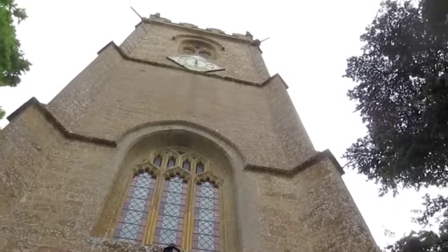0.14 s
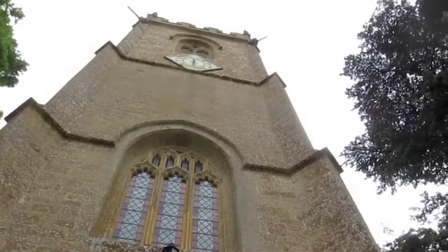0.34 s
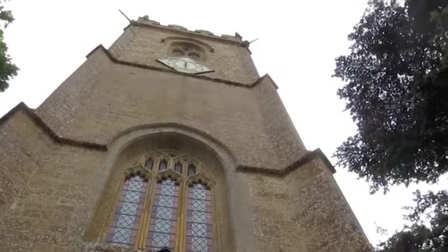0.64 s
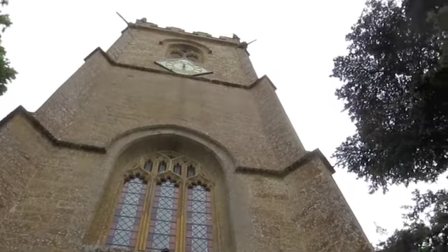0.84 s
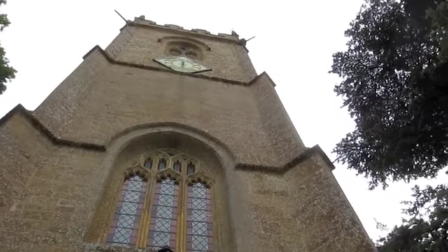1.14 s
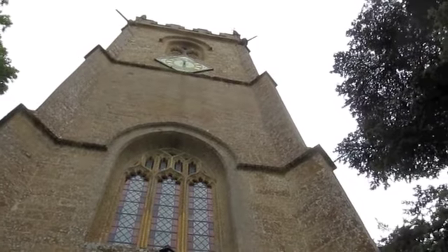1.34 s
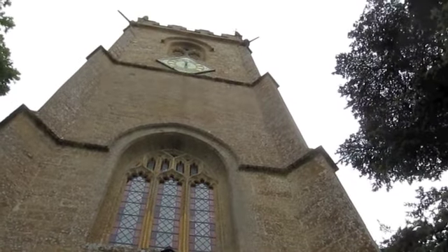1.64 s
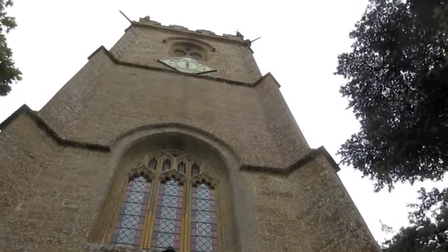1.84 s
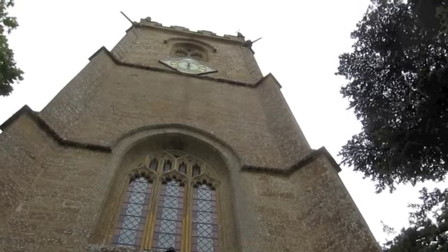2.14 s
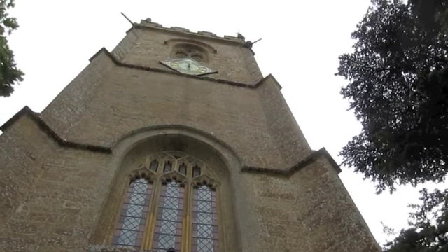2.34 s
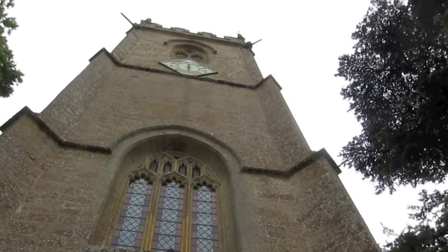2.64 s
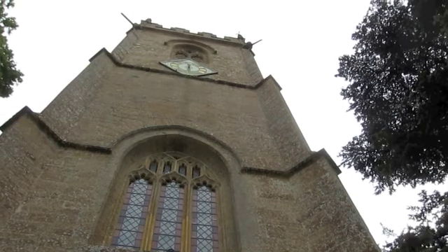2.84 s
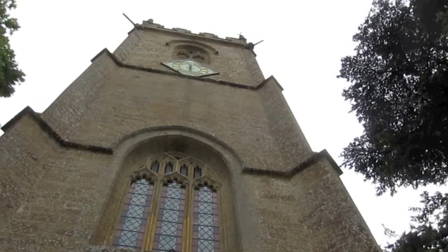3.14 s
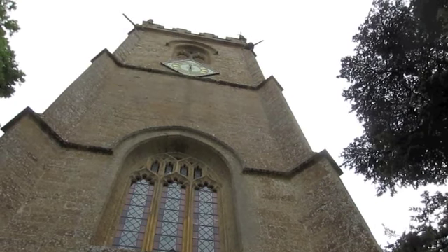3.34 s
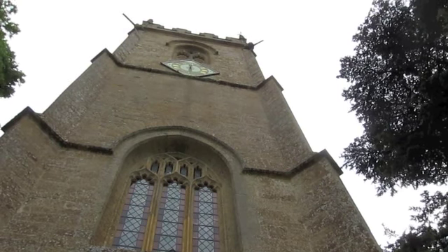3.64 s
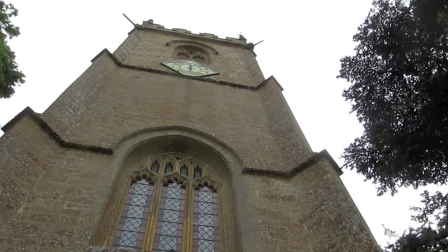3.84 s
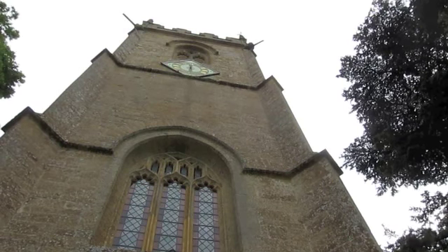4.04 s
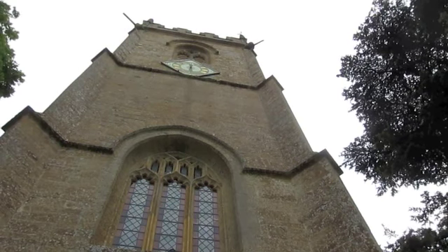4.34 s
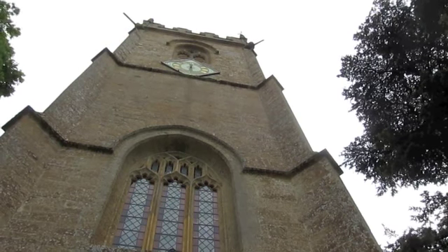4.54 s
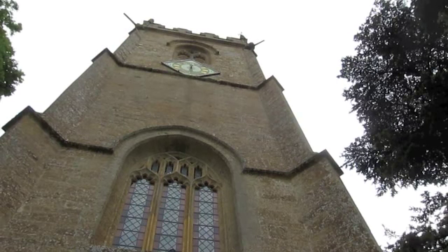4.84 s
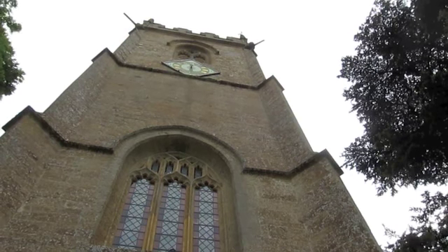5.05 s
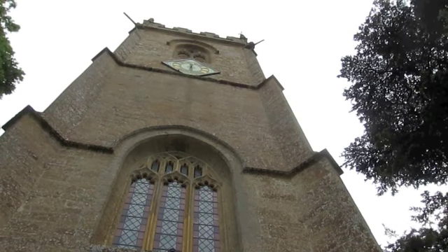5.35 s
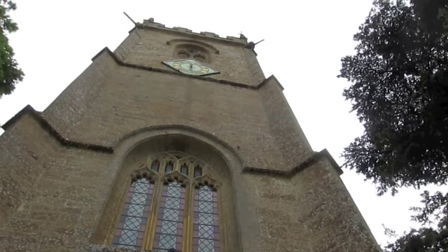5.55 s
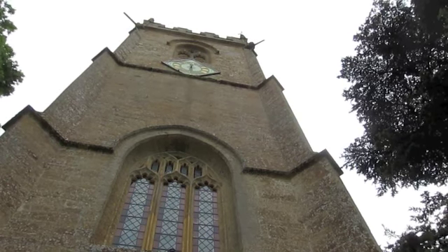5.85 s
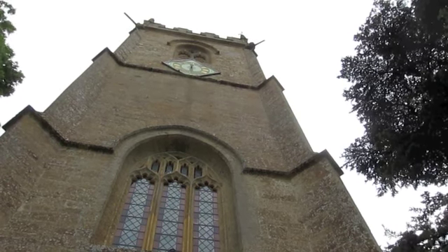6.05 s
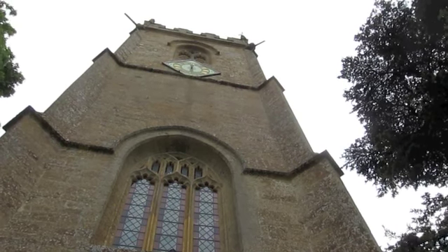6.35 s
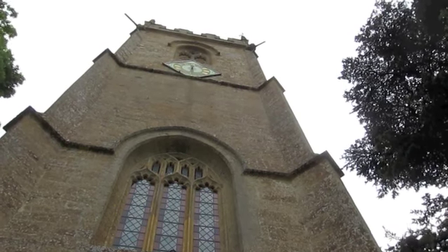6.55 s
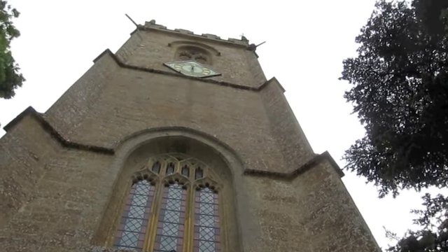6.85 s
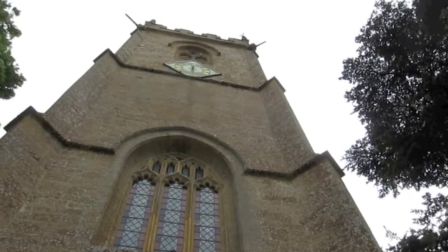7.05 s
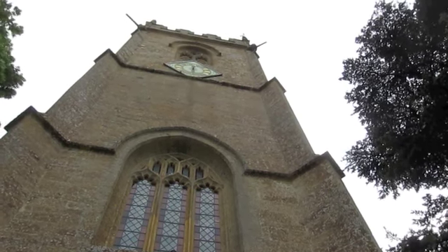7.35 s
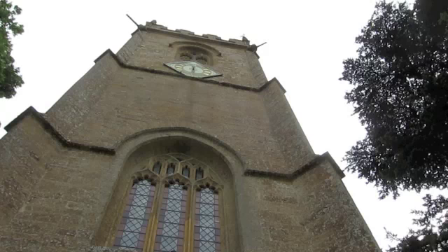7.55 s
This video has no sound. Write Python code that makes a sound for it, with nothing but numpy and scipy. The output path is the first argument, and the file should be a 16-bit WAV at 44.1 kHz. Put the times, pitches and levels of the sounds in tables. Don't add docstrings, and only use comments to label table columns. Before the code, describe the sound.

Outdoors below a church tower, the fading hum of an earlier bell stroke hangs under soft distant traffic and leaf hiss. Low wind thumps hit the left and right microphones separately from 0.1 to 1 second. At about 0.95 the clock hammer strikes: a hard metallic clang, slightly softened by the belfry, opening into a bright ring with a wavering midrange note and long deep hum. The treble fades first, flickering in the wind. A far car gently swells the hiss around 2.7. Similar blows land at 3.35 and 5.8, each marginally harder and overlapping the previous ring. Wind is calmest around 4.4, bumps again from 5.4, and buffets strongly from 6.9 to the end near 7.7. Very faint, thin, high birds whistle intermittently from 2 seconds, and a tiny dry twig snap comes at 5.0. The last stroke is still ringing at the end.

```python
import sys
import numpy as np
from scipy import signal
from scipy.io import wavfile

SR = 44100
rng = np.random.default_rng(int(sys.argv[2]) if len(sys.argv) > 2 else 0)


def volts_from_decibels(level):
    exponent = np.asarray(level, float) / 20
    return 10 ** exponent


def inscribe(sig):
    pcm = np.round(np.clip(np.atleast_2d(sig).T, -1, 1) * 32767)
    wavfile.write(sys.argv[1], SR, pcm.astype(np.int16))


N = 339570
TIME = np.arange(N) / SR


def at_hz(points, hz):
    freq, *columns = np.transpose(points)
    return [np.interp(np.log(hz), np.log(freq), c) for c in columns]


def rms_one(x):
    return x / np.sqrt(np.mean(x ** 2) + 1e-20)


def drift(rate):
    knots = rng.standard_normal(int(N / SR * rate) + 2)
    return rms_one(np.interp(TIME * rate, np.arange(len(knots)), knots))


def bands(length):
    edges = 25 * 2 ** (np.arange(29) / 3)
    white = rng.standard_normal((2, 2, length))
    for k, (low, high) in enumerate(zip(edges, edges[1:])):
        sos = signal.butter(2, [low, high], "band", fs=SR, output="sos")
        first, second = signal.sosfilt(sos, white[k % 2])
        yield np.sqrt(low * high), first, second


def mode(t, hz, level_db, t60, phase, pan_db, lead):
    decay = volts_from_decibels(level_db - 60 * t / t60)
    turn = 2 * np.pi * hz * t + phase
    return np.array([volts_from_decibels(pan_db) * decay * np.cos(turn + lead), decay * np.cos(turn)])


def build_up(t, tau_s=0.0024):
    return 1 - np.exp(-np.maximum(t, 0) / tau_s)


# start in seconds, clang level in dB.
BLOWS = [
    (0.9481, -30),
    (3.355, -29),
    (5.7804, -28.5),
]


def after_blows(make, length_s):
    out = np.zeros((2, N))
    for s, clang_db in BLOWS:
        i = round(s * SR)
        t = TIME[:min(N - i, round(length_s * SR))]
        out[:, i:i + len(t)] += make(t, clang_db)
    return out


NOMINAL, TIERCE = 4, 2
# fall in seconds after the blow, nominal level before it in dB,
# light touch in seconds after the blow, tierce level before the touch in dB, nominal left-right difference
# before the fall in dB.
REBOUND = [
    (0.23, -11, 0.19, -1.5, -14),
    (0.2, -12, 0.27, -0.9, 2.5),
    (0.22, -6.5, 0.089, 2.5, -9),
]


def rebound(ring, t, n, blow):
    fall_s, nominal_db, touch_s, tierce_db, pan_db = REBOUND[blow]
    if n == NOMINAL:
        early = volts_from_decibels(nominal_db + 3.1 * np.exp(-t / 0.067))
        early = early * volts_from_decibels(np.array([[pan_db], [0]]) * build_up(t, .05))
        ring = ring * (early + (1 - early) * build_up(t - fall_s, 0.013))
    if n == TIERCE:
        ring = ring * volts_from_decibels(tierce_db * (1 - build_up(t - touch_s, 0.025)))
    return ring


# time in seconds, gain in dB.
CARRY = [(1.0, -1.2), (1.4, -1.3), (1.9, 1.8), (2.3, 1.5), (3.5, -1.5), (3.8, -.9), (4.1, 1.7), (4.6, 0),
         (5.2, 2.5), (5.75, 0), (5.9, -.3), (6.25, -3.5), (6.45, -2), (6.85, 2), (7.5, 4)]


def through_wind(pair, hz):
    flicker_per_s, db_per_khz = 22, 0.09
    shared = drift(flicker_per_s)
    apart = drift(flicker_per_s) * [[1], [-1]]
    flicker_db = db_per_khz * hz / 1000 * (.7 * shared + .7 * apart)
    return pair * volts_from_decibels(np.interp(TIME, *np.transpose(CARRY)) + flicker_db)


# pitch in Hz, t60 in seconds, rise in seconds.
PAIRS = [(188.23, 44.4, 0.006), (402.91, 17.3, 0.033), (467.96, 30.7, 0.018), (531.67, 8.3, 0.074),
         (747.8, 2.7, 0.12), (929.86, 1.6, 0.006), (1103.51, 2.0, 0.033), (1400.51, 2.2, 0.006)]
# split in Hz, t60 in seconds, left-right difference in dB, left lead in radians.
TWINS = [(-0.3, 4.4, -0.6, -0.04), (-0.41, 60.1, -5.2, -0.17), (-0.84, 38.8, -1.8, 0.05),
         (-1.08, 8.6, 0.0, 0.01), (1.88, 3.4, 0.9, -0.26), (0.62, 2.5, -0.3, -0.26),
         (0.93, 2.3, -4.7, 0.01), (0.83, 2.8, 0.9, -0.67)]
# pitch in Hz, t60 in seconds, twin t60 in seconds, rise in seconds,
# split to the twin in Hz, direct share as a gain.
UPPER = [(1511.78, 3.3, 2.9, 0.011, -3.4, -0.15), (1965.13, 1.63, 1.98, 0.003, 0.72, -0.15),
         (2448.05, 2.85, 2.52, 0.27, 3.36, -0.0), (2965.87, 1.92, 1.47, 0.4, -5.55, 0.13),
         (3490.3, 1.09, 2.17, 0.4, -0.81, 0.02), (4031.81, 1.89, 1.81, 0.164, 8.1, 0.26),
         (4580.9, 1.49, 1.51, 0.038, 1.6, 0.8), (5126.16, 1.37, 1.32, 0.342, 10.65, 0.15),
         (5683.72, 1.32, 0.75, 0.314, -2.75, 0.04)]
# level in dB, twin level in dB,
# first swell of the twins in seconds, left-right difference in dB, left lead in radians.
LEFT_OVER = [(-33.1, -57.1, 2.068, -1.6, -0.2), (-48.0, -53.5, 1.516, 4.7, 0.64),
             (-19.0, -27.0, 0.785, -1.2, -0.0), (-52.7, -53.5, 0.211, -0.2, 0.01),
             (-54.6, -56.9, 0.248, -2.8, 0.02), (-70.0, -70.0, 0.0, 0.0, 0.0),
             (-70.0, -70.0, 0.0, 0.0, 0.0), (-70.0, -70.0, 0.0, 0.0, 0.0), (-37.6, -66.2, 0.148, -3.7, 0.0),
             (-70.0, -70.0, 0.0, 0.0, 0.0), (-47.0, -58.7, 0.117, -4.1, -0.68)]
FIRST = [(-31.2, -38.4, 1.505, -0.9, -0.04), (-41.3, -49.9, 1.805, 5.4, -0.19),
         (-13.4, -21.7, 1.112, -1.2, 0.02), (-40.3, -44.4, 0.016, -0.0, 0.0),
         (-18.4, -40.7, 0.507, 0.3, -0.22), (-32.4, -46.7, 1.517, 0.8, 1.3),
         (-17.3, -26.9, 0.664, -5.0, -0.38), (-46.9, -39.7, 0.457, 8.2, -0.66)]
SECOND = [(-31.2, -39.6, 1.667, -1.0, -0.01), (-37.9, -56.6, 1.189, -0.4, 0.4),
          (-21.0, -23.9, 0.027, -1.3, 0.05), (-40.2, -43.5, 0.041, -0.1, -0.01),
          (-21.1, -29.0, 0.528, 2.0, -0.28), (-29.4, -38.0, 1.462, 0.3, 0.09),
          (-17.0, -25.4, 0.735, -2.6, -0.09), (-31.8, -52.9, 0.577, -0.0, 0.04)]
THIRD = [(-37.3, -40.0, 1.972, -0.8, -0.28), (-45.6, -62.6, 1.134, 2.1, 0.62),
         (-18.3, -23.9, 1.148, -1.3, 0.03), (-42.7, -39.0, 0.018, -0.1, -0.01),
         (-29.9, -29.5, 0.059, 1.2, -0.51), (-32.0, -39.3, 1.445, 1.1, -0.17),
         (-27.2, -41.1, 0.717, 1.1, -0.1), (-33.8, -55.4, 0.261, -0.4, 0.06)]
UPPER_FIRST = [(-12.5, -41.6, 0.019, -5.2, 0.85), (-13.0, -23.1, 0.564, -6.9, -0.04),
               (-15.1, -28.1, 0.168, -20.6, -2.21), (-32.3, -20.8, 0.058, -16.0, 3.11),
               (-19.4, -31.7, 0.157, -1.7, 0.3), (-36.5, -42.5, 0.09, 1.1, 1.83),
               (-39.6, -52.2, 0.213, -6.3, -2.1), (-32.2, -37.6, 0.048, -1.7, -0.64),
               (-30.5, -31.9, 0.308, -2.9, 1.08)]
UPPER_SECOND = [(-13.6, -25.2, 0.023, -5.0, -0.47), (-14.0, -36.5, 0.327, -5.1, 0.14),
                (-15.7, -22.4, 0.156, -10.4, -0.24), (-25.6, -24.8, 0.085, -5.4, -1.18),
                (-11.0, -37.6, 1.216, -2.1, 1.6), (-36, -43.5, 0.128, -9, -1.22),
                (-41.3, -49.9, 0.444, -3.1, 2.19), (-31.1, -36.4, 0.066, -2.0, 1.26),
                (-34.1, -37.6, 0.352, 6.3, -0.08)]
UPPER_THIRD = [(-13.8, -25.1, 0.033, -2.3, 0.38), (-16.5, -29.1, 0.524, -5.2, -0.29),
               (-13.9, -21.1, 0.148, -6.3, 2.62), (-24.9, -31.8, 0.113, -5.0, 0.88),
               (-29.9, -24.1, 1.079, 11.5, 0.55), (-35.8, -47.5, 0.09, -3.2, 1.6),
               (-45.1, -41.5, 0.215, -2.5, -2.68), (-35.3, -46.6, 0.074, -6.9, -1.4),
               (-30.2, -31.7, 0.304, -1.2, 0.41)]
# twin left-right difference in dB,
# twin left lead in radians, left drift in dB/s, right drift in dB/s, lead drift in rad/s.
AIR_FIRST = [(7.9, 1.28, 1.6, -0.2, -0.6), (-4.2, 0.58, 1.8, 0.8, -0.1), (2.4, -0.61, -1.3, -3.2, 0.6),
             (-11.3, -1.92, 10.0, -0.8, -6.0), (-11.2, 2.81, 9.9, 0.9, -0.5), (-0.8, -0.04, -10, 0.3, -0.5),
             (-0.1, 2.01, 10.0, 8.2, 5.2), (-0.4, -1.03, -5.7, 5.0, 2.9), (-7.7, 1.84, -5.6, -9.5, 0.1)]
AIR_SECOND = [(-1.2, -0.2, -0.3, -1.5, 0.3), (-0.7, -0.36, 3.2, 6.3, -0.1), (-7.3, -0.25, 4.1, -3.3, -0.0),
              (1.5, 0.09, -4.2, 3.6, 1.0), (4.6, -0.95, 8.9, 1.2, -0.7), (-5.4, -1.52, 0.7, 0.2, -0.1),
              (4.1, -2.36, 3.8, 7.8, -3.5), (-2.9, 0.3, -6.4, -10.0, 1.2), (-0.5, -1.17, -10.0, 5.9, -0.7)]
AIR_THIRD = [(1.7, 0.33, -1.1, 1.4, 0.0), (-6.0, 0.37, 3.9, 0.7, 0.5), (-5.8, 1.47, -1.1, -5.4, -2.3),
             (3.6, 0.48, 4.5, 5.4, -0.0), (-13.1, -0.15, 0.1, -6.2, -1.3), (0.3, -0.42, 8.3, -2.7, 0.4),
             (0.1, 2.01, 3.2, 10.0, -3.4), (-0.2, -0.78, 10.0, 10.0, 6.0), (-0.2, 0.69, -10.0, -6.4, 0.6)]


def bell():
    upper_db = 5
    shock_db, shock_s, shock_hz = 11, 0.017, 1300
    handover_rad = 1.55
    out = np.zeros((2, N))
    starts = [0] + [s for s, _ in BLOWS] + [N / SR]
    pairs = list(PAIRS) + [(hz, t60, rise_s) for hz, t60, _, rise_s, *_ in UPPER]
    twins = list(TWINS) + [(split, twin_t60, 0, 0) for _, _, twin_t60, _, split, _ in UPPER]
    states = [LEFT_OVER, [*FIRST, *UPPER_FIRST], [*SECOND, *UPPER_SECOND], [*THIRD, *UPPER_THIRD]]
    paths = [AIR_FIRST, AIR_SECOND, AIR_THIRD]
    for n, (main, twin) in enumerate(zip(pairs, twins)):
        hz, t60, rise_s = main
        split, twin_t60, twin_pan_db, twin_lead = twin
        pair, first_phase = np.zeros((2, N)), rng.uniform(0, 2 * np.pi)
        for k, state in enumerate(states):
            if n >= len(state):
                continue
            db, twin_db, swell_s, pan_db, lead = state[n]
            share, left_drift, right_drift, turn = .28, 0, 0, 0
            if k and n >= len(PAIRS):
                u = n - len(PAIRS)
                db, twin_db = db + upper_db, twin_db + upper_db
                share = UPPER[u][5]
                twin_pan_db, twin_lead, left_drift, right_drift, turn = paths[k - 1][u]
            i = round(starts[k] * SR)
            until_next = round((starts[k + 1] + .4) * SR) - i
            t = TIME[:min(N - i, until_next, round(max(t60, twin_t60) * SR))]

            phase = first_phase + 2 * np.pi * hz * i / SR + handover_rad * k
            behind = 2 * np.pi * split * swell_s
            ring = mode(t, hz, db, t60, phase, pan_db, lead + turn * t)
            ring += mode(t, hz + split, twin_db, twin_t60, phase - behind, twin_pan_db, twin_lead + turn * t)
            ring *= volts_from_decibels(np.outer([left_drift, right_drift], np.minimum(t, .65 * t60)))
            if k:
                ring = rebound(ring, t, n, k - 1)
                if n == NOMINAL:
                    rise_s = .008
                shock = volts_from_decibels(shock_db * (hz > shock_hz) * np.exp(-t / shock_s)) - 1
                direct = (share + .28 * shock) * build_up(t - .004, 0.0039)
                by_belfry = 0.75 * build_up(t - .004, rise_s)
                ring *= direct + by_belfry
            next_blow = t + starts[k] - starts[k + 1]
            pair[:, i:i + len(t)] += ring * (1 - build_up(next_blow - .004, rise_s))
        if hz > shock_hz:
            pair = through_wind(pair, hz)
        out += pair
    return out


# pitch in Hz, density in dB per Hz, left-right likeness from 0 to 1.
AIR = [(25, -11, .3), (59.5, -3.5, 0.94), (152, -9.5, 0.98), (288, -7.5, 0.93), (690, -6, .85),
       (1060, -5.5, 0.68), (1880, -12.5, 0.52), (2790, -16, 0.01), (7030, -29, 0.01), (8700, -36, 0.01),
       (10500, -49, 0.01), (11300, -46, 0.01), (12500, -46.5, 0.01), (14800, -48, 0.01), (16000, -62, 0.01)]
# time in seconds, width in seconds, pitch in Hz, width in octaves, gain in dB.
PASSING = (2.7, 1.3, 1500, 1.1, 2.8)


def air():
    at_s, width_s, car_hz, octaves, car_db = PASSING
    out = 0
    for hz, mid, side in bands(N):
        db, alike = at_hz(AIR, hz)
        car = car_db * np.exp(-((TIME - at_s) / width_s) ** 2 - (np.log2(hz / car_hz) / octaves) ** 2)
        gain = volts_from_decibels(db + car + 0.23 * drift(6.6))
        out = out + gain * (np.sqrt(1 + alike) * mid + np.sqrt(1 - alike) * side * [[1], [-1]])
    return volts_from_decibels(-42) * rms_one(out)


# time in seconds, level in dB.
BREEZE = [(0, -52), (.5, -52), (1.5, -52.5), (2.8, -54), (4.4, -62), (5.8, -54), (6.8, -54.5), (7.7, -56)]
# start in seconds, length in seconds, level in dB, port (0 left, 1 right).
GUSTS = [(0.058, 0.18, -31, 0), (0.112, .26, -36, 1), (0.594, .28, -34.5, 1), (0.702, 0.16, -36.5, 0),
         (0.91, 0.081, -27.5, 0), (0.992, 0.27, -50, 0), (0.856, 0.49, -50, 1), (4.85, 0.39, -48.5, 0),
         (5.4, .36, -57, 0), (5.378, 0.31, -40.5, 1), (5.882, 0.394, -36.5, 0), (6.448, 0.27, -43.5, 1),
         (6.87, 0.6, -43, 0), (6.84, 0.29, -41, 1), (7.123, .2, -38.5, 1), (7.224, 0.21, -31, 0),
         (7.316, 0.11, -44.5, 1), (7.47, 0.13, -33.5, 1)]
# time in seconds, peak in dB, pitch in Hz, port (0 left, 1 right).
THUMPS = [(0.067, -21, 115, 0), (0.108, -22, 92, 0), (0.157, -23, 106, 1), (0.195, -10, 152, 1),
          (0.192, -26, 105, 0), (0.743, -10, 106, 1), (0.78, -14.5, 138, 0), (0.786, -16, 84, 1),
          (0.86, -16, 122, 0), (0.927, -10, 181, 0), (1.183, -24, 72, 0), (5.404, -21, 81, 1),
          (5.608, -23, 73, 1), (5.963, -24.5, 117, 0), (6.237, -18.5, 132, 0), (6.501, -18, 102, 1),
          (6.59, -21, 90, 1), (6.663, -23, 98, 1), (6.948, -20, 79, 1), (7.134, -20, 114, 1),
          (7.163, -16.5, 103, 1), (7.19, -17, 89, 1), (7.267, -13, 114, 1), (7.275, -17, 121, 0),
          (7.314, -23, 138, 0), (7.424, -14.5, 107, 0), (7.51, -10, 109, 1)]


def wind():
    edge_s = 0.051
    strength = np.ones((2, 1)) * volts_from_decibels(np.interp(TIME, *np.transpose(BREEZE)))
    for s, length, db, port in GUSTS:
        inside = np.minimum(TIME - s, s + length - TIME) / edge_s
        strength[round(port)] += volts_from_decibels(db) * np.clip(inside + .5, 0, 1)
    sos = signal.butter(2, [28, 170], "band", fs=SR, output="sos")
    out = np.zeros((2, N))
    for port in range(2):
        rumble = rms_one(signal.sosfilt(sos, rng.standard_normal(N)))
        lumps = volts_from_decibels(2.3 * drift(25) + 3.6 * drift(3.7))
        out[port] = rumble * lumps * strength[port] * volts_from_decibels(-1.1)
    for s, db, hz, port in THUMPS:
        i, chance = round(s * SR), rng.random()
        t = TIME[i - 2000:i + 2000] - s
        swing = np.exp(-(t * hz / 0.85) ** 2) * np.cos(2 * np.pi * (hz * t + chance))
        sharp_edge = np.exp(-(t * hz / 0.63) ** 2) * np.cos(2 * np.pi * (2.0 * hz * t + chance))
        out[round(port), i - 2000:i + 2000] += volts_from_decibels(db - 5.5) * (swing + 0.51 * sharp_edge)
    return out


# pitch in Hz, density in dB per Hz.
CLANG = [(150, -17), (300, -7.5), (600, -4), (1000, -2), (2500, 5), (5000, -7.5), (8000, -28), (10500, -37),
         (12500, -43), (14500, -47.5), (15400, -66)]


def clang(t, clang_db):
    out = 0
    for hz, left, right in bands(len(t)):
        crack_t60 = 0.14 * (1000 / hz) ** 0.62
        scatter_t60 = .5 * min(1, 5000 / hz) ** 1.5
        fall = volts_from_decibels(-60 * t / crack_t60) + volts_from_decibels(-25.0 - 60 * t / scatter_t60)
        out = out + volts_from_decibels(at_hz(CLANG, hz)[0]) * fall * np.array([left, 0.93 * left + 1.0 * right])
    arrival = 0.5 * build_up(t, 0.0011) + 0.5 * build_up(t - .007, 0.00076)
    return volts_from_decibels(clang_db + 22.0) * out * arrival


SWARM_HZ = np.geomspace(1200, 10500, 110) * rng.uniform(.99, 1.01, 110)


def swarm(t, clang_db):
    out = 0
    for hz in SWARM_HZ:
        a, b, c, d = rng.random(4)
        db = clang_db - 16.5 - 6.9 * np.log2(hz / 1500) + 14 * (a - .5)
        t60 = (0.25 + 0.6 * d) * min(1, 5500 / hz) ** 1.9
        out = out + mode(t, hz, db, t60, 2 * np.pi * b, 10 * (c - .5), 6 * d)
    return out * build_up(t)


def shoulder(t, clang_db):
    cluster = [(937, 10, 0.2), (946, 3.4, 0.2), (1085, 6.5, 0.19)]   # (Hz, dB over the clang, t60 s)
    out = 0
    for hz, db, t60 in cluster:
        out = out + mode(t, hz, clang_db + db, t60, rng.uniform(0, 2 * np.pi), -1.5, .1)
    return out * build_up(t - .004)


# pitch in Hz, t60 in seconds,
# levels after the first, second and third blow in dB.
NEIGHBOURS = [(1483, 3, -43, -40, -40), (2907.2, 1.9, -40, -43, -45), (4010.3, 2, -48, -47, -46),
              (4016, 2, -50, -48, -50), (4560, 1.5, -49, -52, -51), (6222, 1.3, -55, -47, -48),
              (6235, 1.5, -55, -63, -61), (7838, .6, -62, -57, -60), (2460, .14, -29, -33, -33)]


def neighbours():
    out = np.zeros((2, N))
    for hz, t60, *levels in NEIGHBOURS:
        for (s, _), db in zip(BLOWS, levels):
            i = round(s * SR)
            t = TIME[:min(N - i, round(t60 * SR))]
            ring = mode(t, hz, db, t60, rng.uniform(0, 2 * np.pi), -1.5, .3)
            out[:, i:i + len(t)] += ring * build_up(t - .004)
    return out


# pitch in Hz, level in dB, t60 in seconds.
INNER = [(328.0, -37, 0.4), (810.0, -50.0, 2.12), (888.0, -37.5, 1.5), (957.0, -35, 1.4),
         (1189.0, -38.5, 2.3), (1308.0, -43.5, 1.86), (1680.0, -44.1, 1.41), (1728.0, -32.3, 0.53),
         (1798.0, -39.7, 2.07), (2105.0, -47.8, 1.23), (2229.0, -41.8, 0.34), (2627.0, -46.1, 3.0),
         (2848.0, -48.6, 0.88), (2946.5, -49, 1.5), (3047.0, -48.8, 2.31), (3354.0, -46.1, 1.64),
         (3752.0, -42.8, 1.23), (3898.0, -38.3, 0.73), (4247.0, -44.7, 0.94), (4406.0, -52.0, 2.38),
         (4791.0, -47.5, 2.0), (4861.0, -48.4, 1.66), (5036.0, -45.0, 0.67), (5423.0, -49.0, 1.38),
         (5481.0, -47.7, 2.07), (5932.0, -56.5, 1.89), (6262.5, -58, 1.4), (6750.0, -56.2, 1.14),
         (7052.0, -56.6, 1.11), (9631.0, -65.6, 0.85),
         (6130, -47.5, 0.6), (6300, -45.5, 0.21), (7154, -64.5, 1.2), (7300, -61.5, .5), (7960, -62.5, .7),
       (8330, -59.5, .5), (8920, -60.5, .3), (8900, -65.5, 0.98), (9491, -60, .14), (10370, -72.5, .4),
       (12470, -67, .3), (13210, -73, .3), (13490, -70.5, .28), (14090, -72, .26), (14340, -78, .4),
       (14660, -73.5, .4)]


def inner_modes(t, clang_db):
    out = 0
    for hz, db, t60 in INNER:
        a, b, c, d = rng.random(4)
        beat = 1 + 0.77 * np.cos(2 * np.pi * (hz / 700 * t + d))
        struck_db = db + 0.5 + 7 * (a - .5)
        out = out + beat * mode(t, hz, struck_db, t60, 2 * np.pi * b, 5 * (c - .8), hz / 3000 * d)
    fresh = volts_from_decibels(8.2 * np.exp(-t / 0.012))
    return out * fresh * build_up(t - .006)


# start in seconds, length in seconds, start pitch in Hz, end pitch in Hz,
# level in dB, left-right difference in dB.
BIRDS = [(2.05, 0.1, 7600, 7400, -67, -9), (3.3, 0.04, 7700, 7500, -60, -4),
         (4.22, .23, 7550, 7300, -66, -3), (4.824, 0.25, 7440, 7300, -67, 0),
         (5.53, 0.14, 7550, 7600, -68.5, -2), (5.73, 0.038, 7700, 7600, -65, 0),
         (6.215, 0.1, 7650, 7300, -69, 0), (6.885, 0.17, 7370, 7000, -58.5, -6),
         (7.55, .03, 7400, 7150, -68, 0), (7.583, .062, 7500, 7200, -63, -2),
         (7.648, .045, 7200, 7200, -63.5, 0), (7.643, .035, 5300, 5170, -61, 1.5)]


def birds():
    out = np.zeros((2, N))
    for s, length, start_hz, end_hz, db, pan_db in BIRDS:
        i = round(s * SR)
        t = TIME[:min(N - i, round(length * SR))]
        hz = start_hz + (end_hz - start_hz) * t / length + 70 * drift(500)[:len(t)]
        shape = np.sin(np.pi * t / length) ** 0.55 * volts_from_decibels(db + 3.1 * drift(130)[:len(t)])
        whistle = shape * np.sin(2 * np.pi * np.cumsum(hz) / SR)
        out[:, i:i + len(t)] += whistle * volts_from_decibels([[pan_db / 2], [-pan_db / 2]])
    return out


# time in seconds, level in dB.
TICK = (5.015, -57.5)


def twig():
    snap_s, db = TICK
    t = TIME - snap_s
    sos = signal.butter(2, [5000, 15000], "band", fs=SR, output="sos")
    noise = signal.sosfilt(sos, rng.standard_normal((2, N)))
    return volts_from_decibels(db) * noise * (t > 0) * np.exp(-np.abs(t) / .012)


def scene():
    blows = after_blows(clang, .6) + after_blows(swarm, .9) + after_blows(shoulder, 0.42)
    blows += after_blows(inner_modes, 2.3) + neighbours()
    return bell() + air() + wind() + blows + birds() + twig()


def roll_off(x):
    return signal.sosfilt(signal.butter(12, 15720, fs=SR, output="sos"), x)


def record(dry):
    dead = signal.cheby2(4, 30, [10850, 11720], "bandstop", fs=SR, output="sos")
    mix = signal.sosfilt(dead, dry)
    return roll_off(mix)


dry = scene()
out = record(dry)
inscribe(out)
```